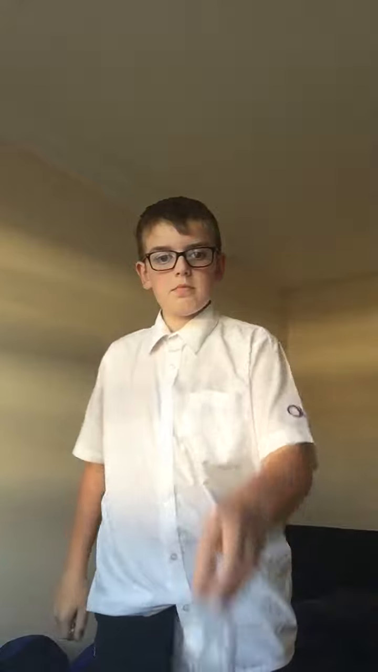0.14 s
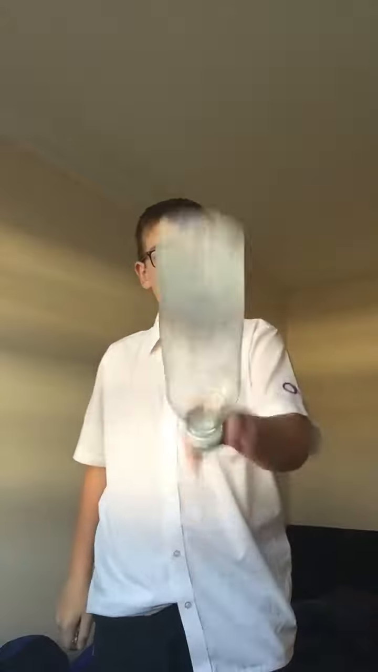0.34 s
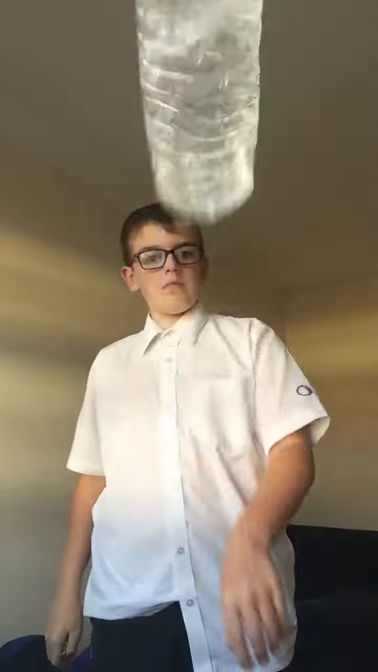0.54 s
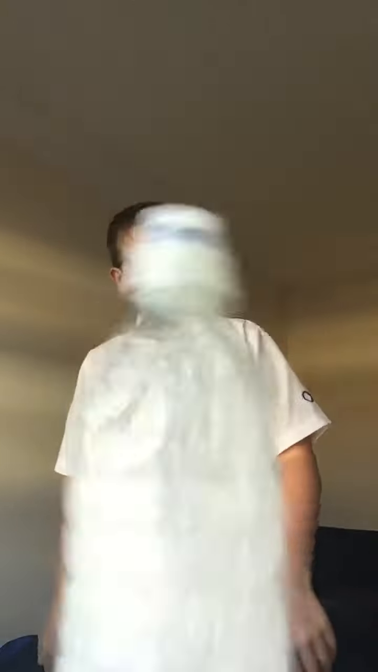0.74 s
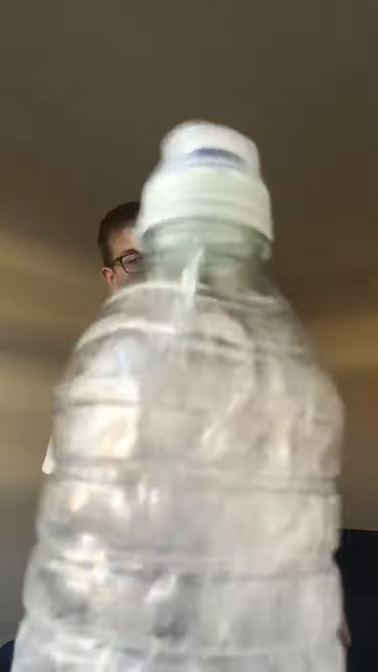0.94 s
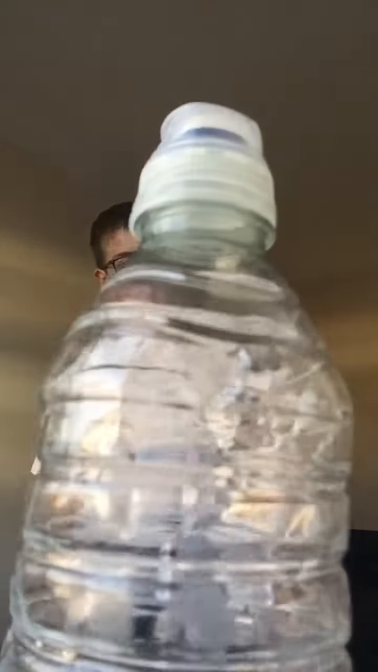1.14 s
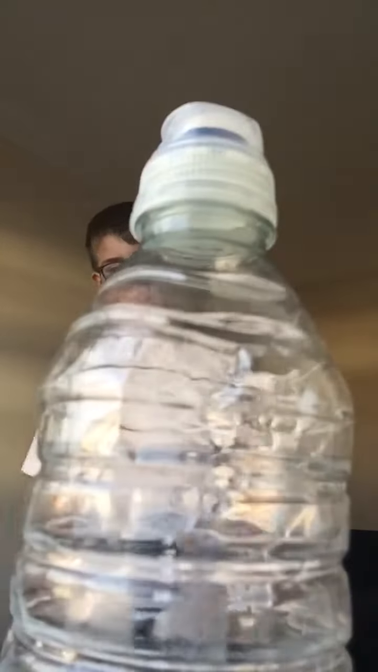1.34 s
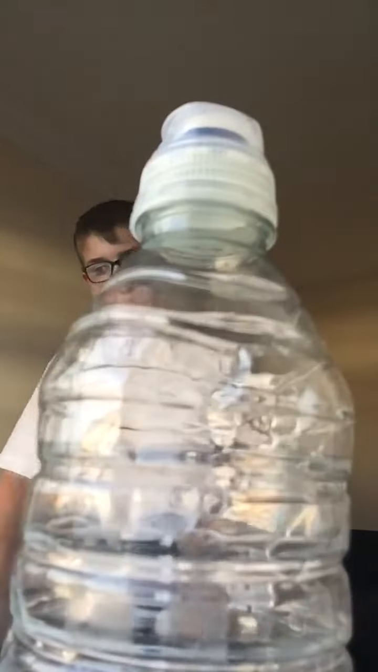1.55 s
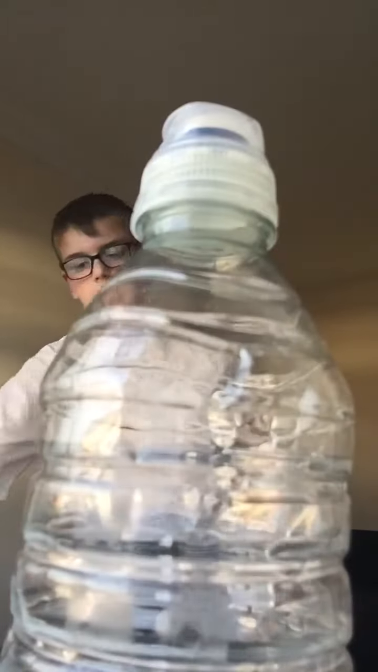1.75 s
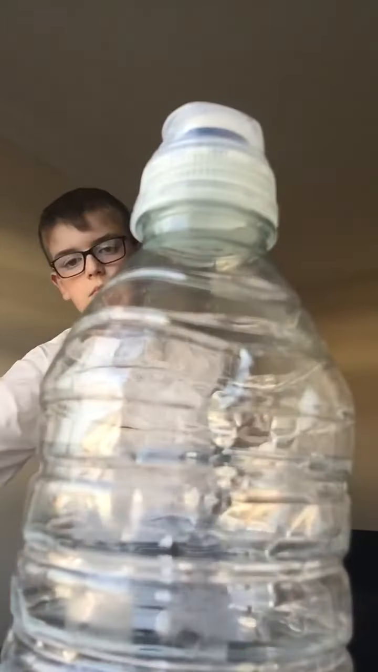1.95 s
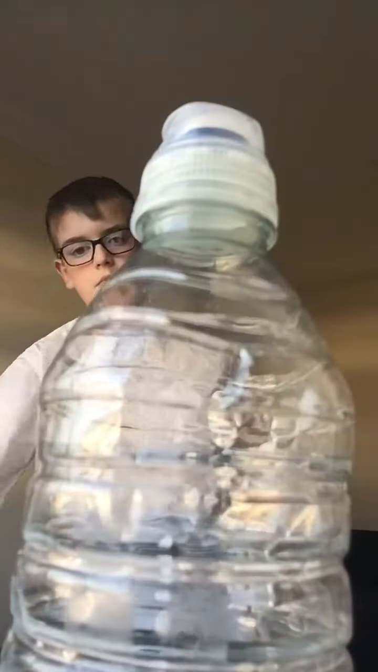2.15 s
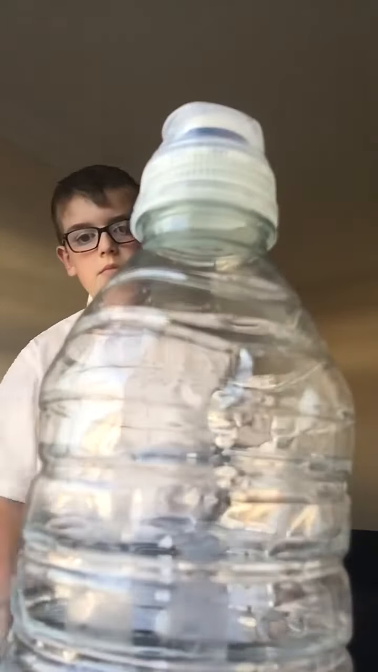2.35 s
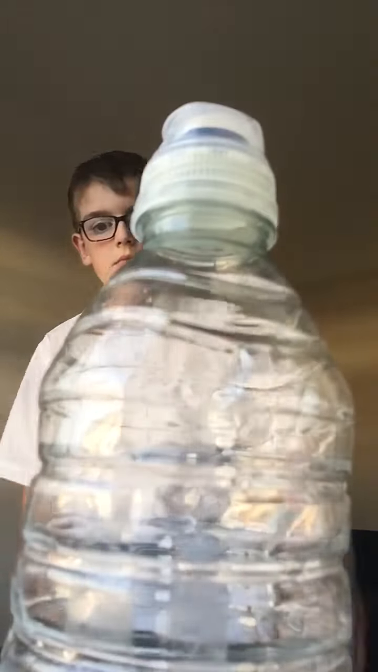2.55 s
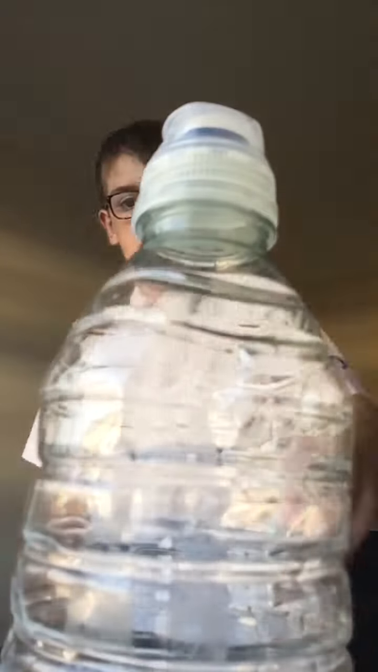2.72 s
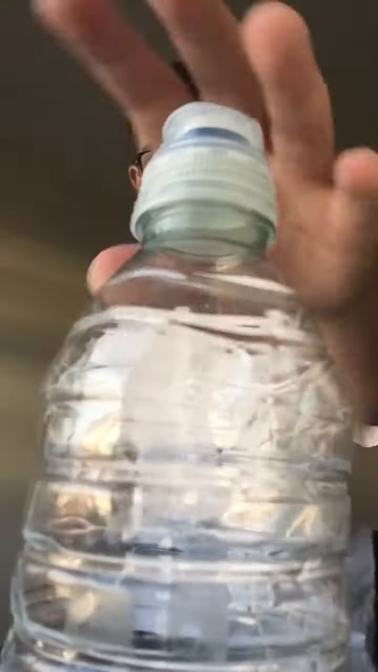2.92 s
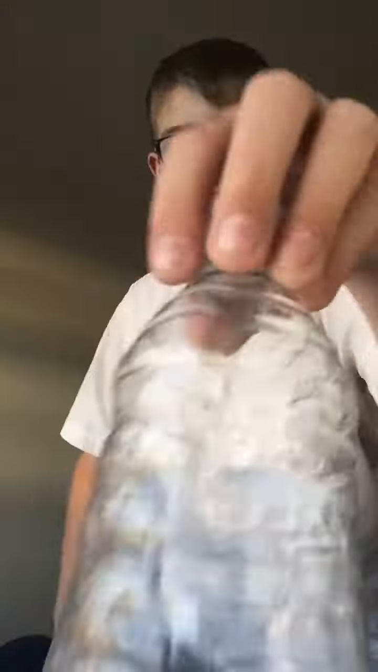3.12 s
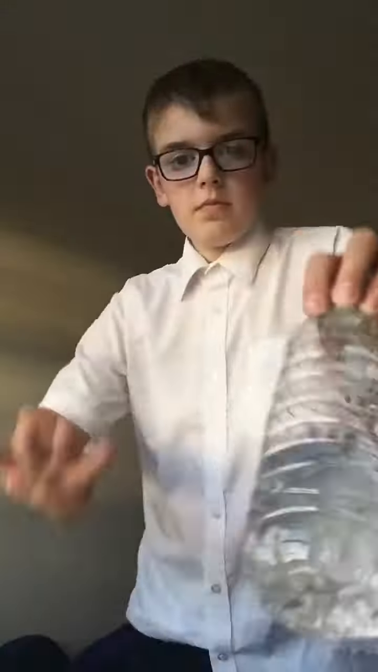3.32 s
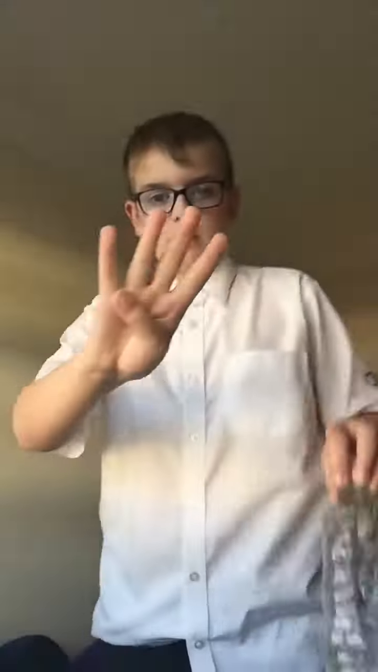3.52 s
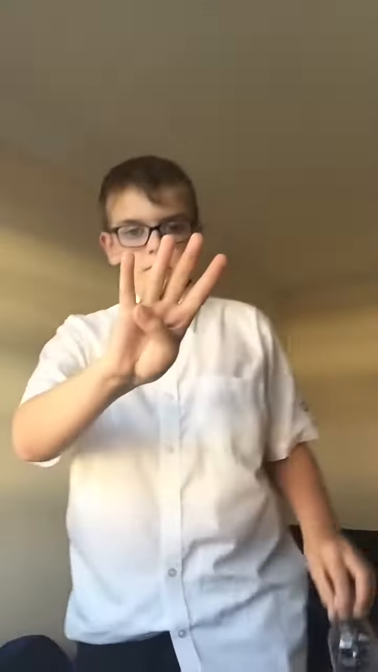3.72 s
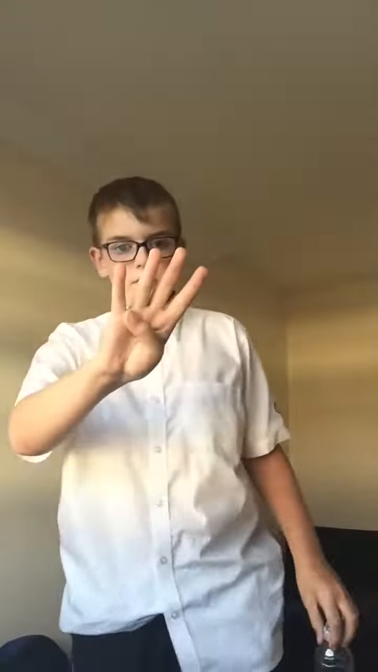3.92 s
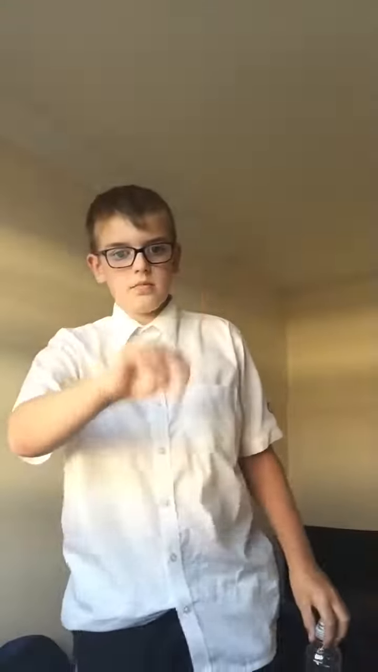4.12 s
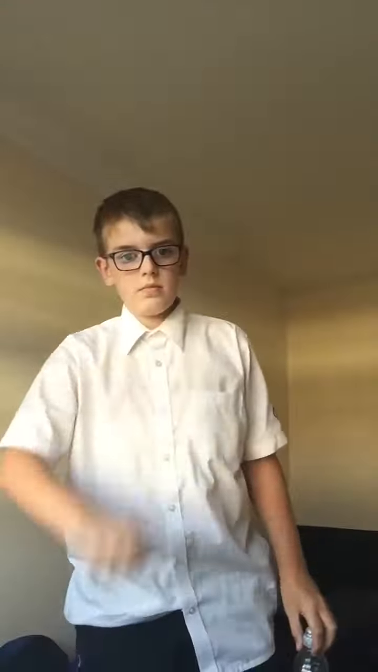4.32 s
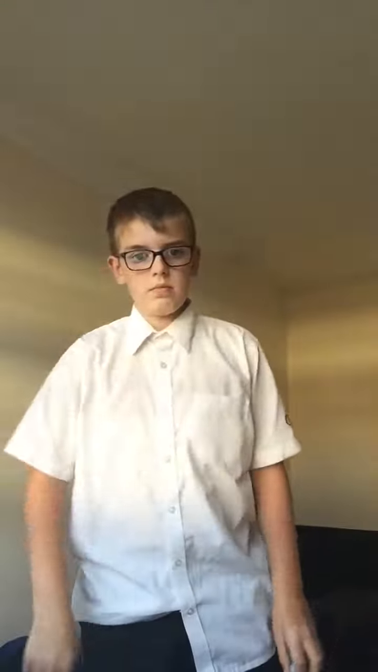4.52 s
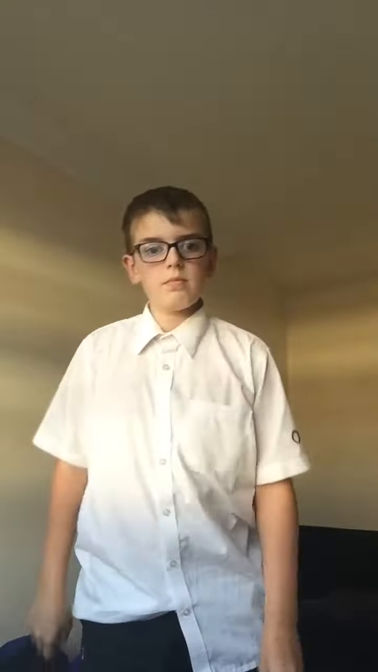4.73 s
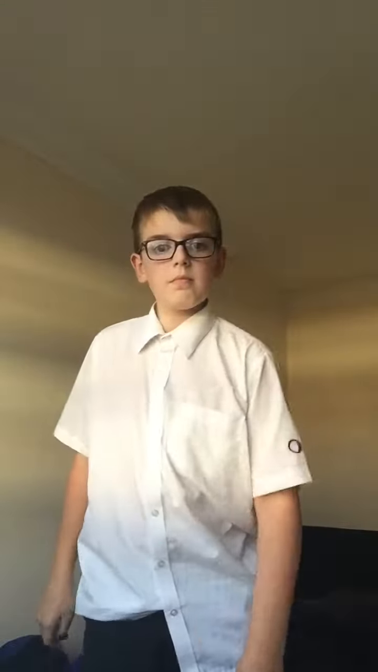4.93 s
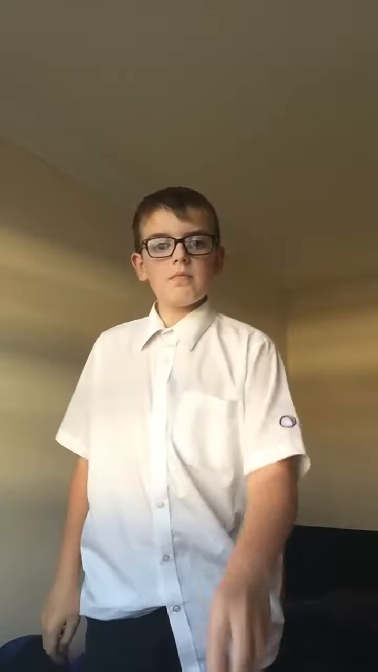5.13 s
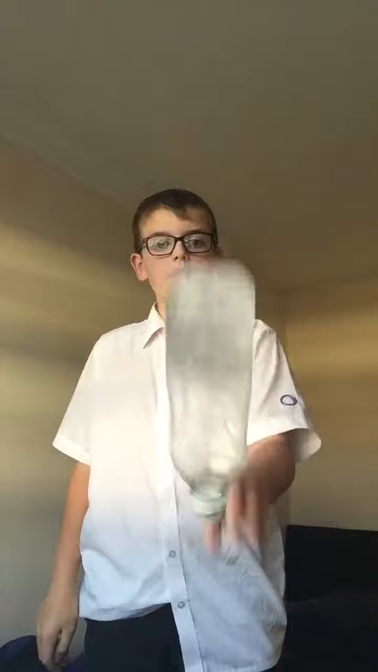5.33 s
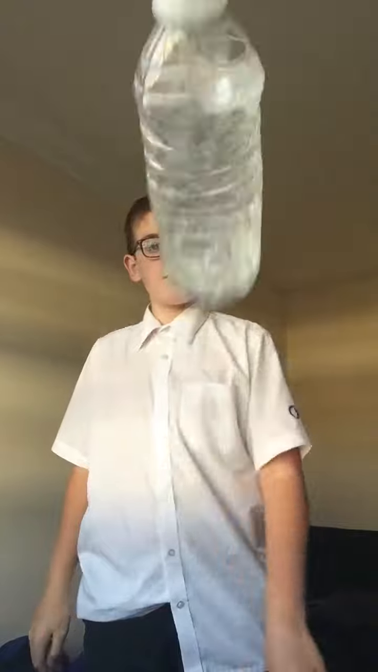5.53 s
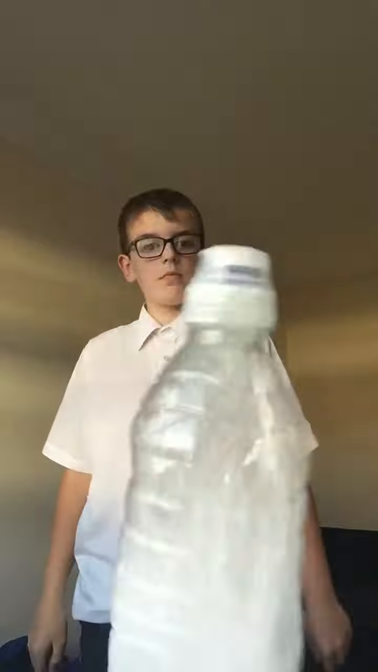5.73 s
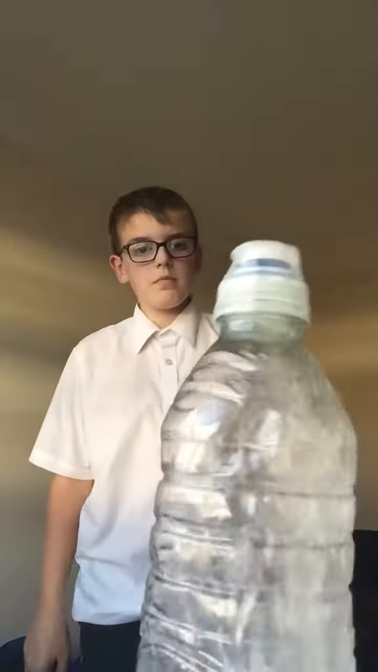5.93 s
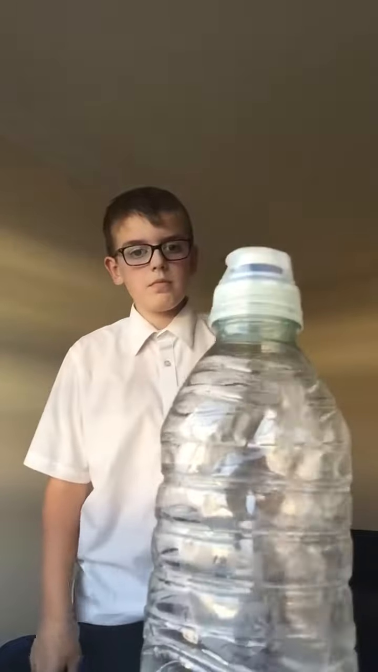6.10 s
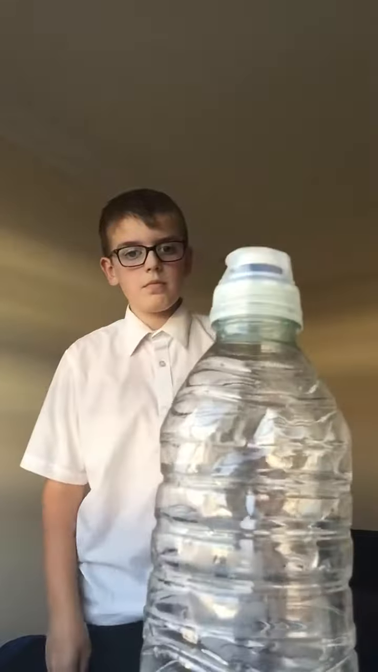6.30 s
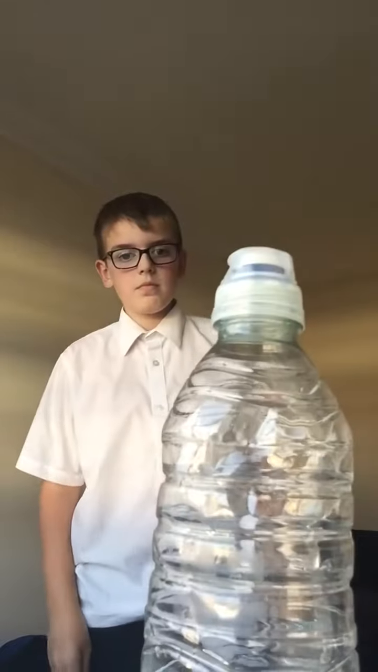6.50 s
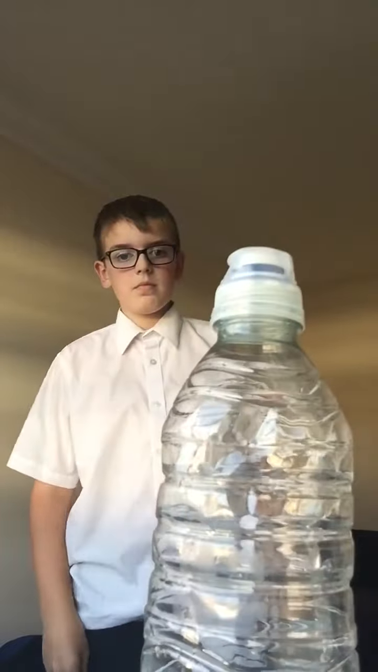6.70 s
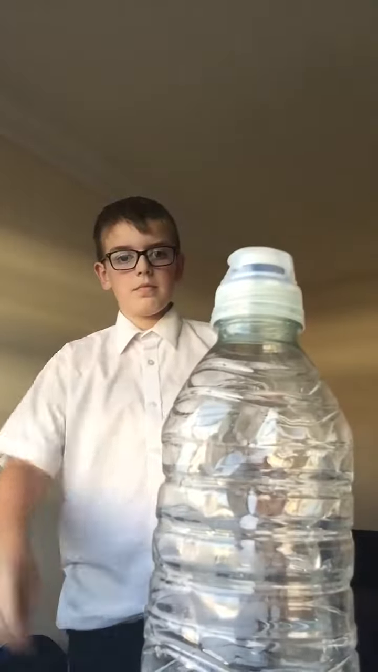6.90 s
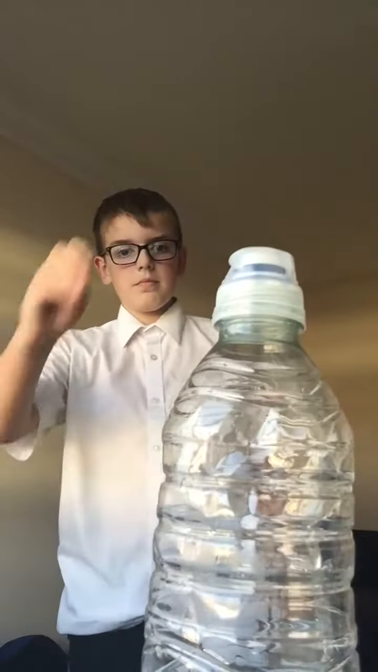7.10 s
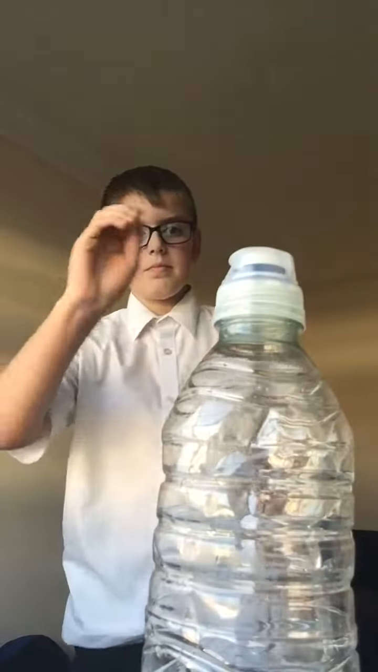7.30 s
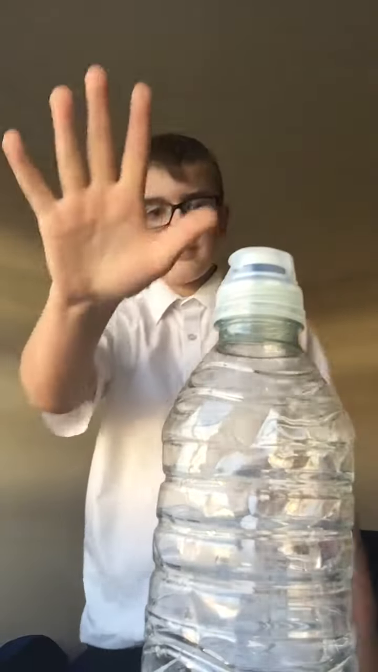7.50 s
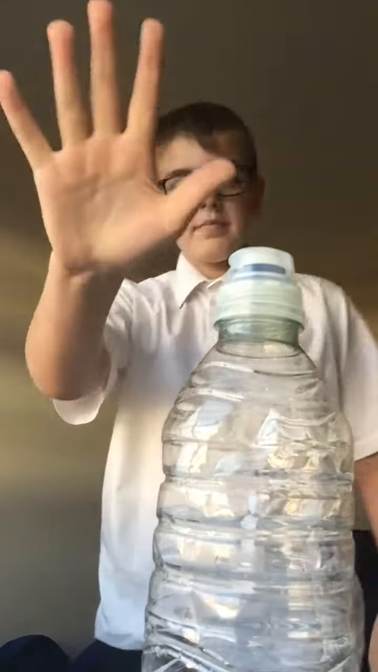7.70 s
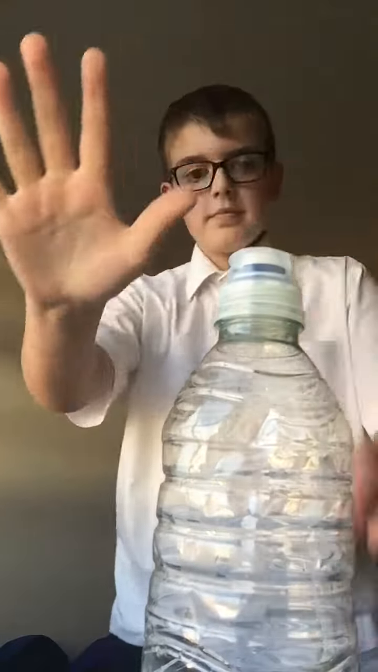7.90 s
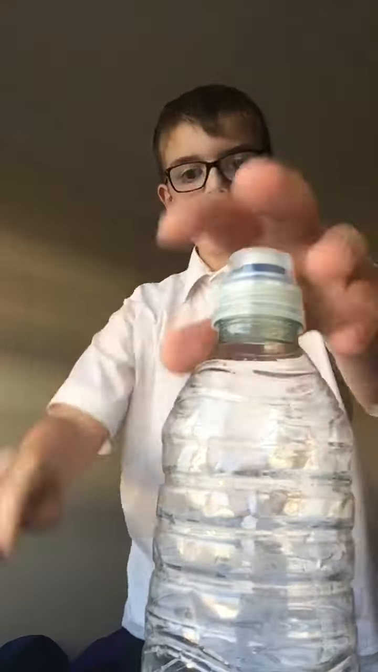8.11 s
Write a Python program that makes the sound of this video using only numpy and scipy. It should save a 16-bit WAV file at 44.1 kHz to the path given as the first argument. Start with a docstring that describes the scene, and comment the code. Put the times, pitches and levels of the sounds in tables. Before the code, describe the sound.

In a small quiet room, a part-filled plastic bottle lands on a table right beside the microphone with a huge, distorted knock and low water gulp, then rocks and ticks to rest. Hand slaps, shirt rustles and soft carpet steps follow; the bottle is gripped with a crumple and dull slosh. After near silence a second flip lands just as hard and settles, then a sleeve swishes and footsteps thud.

```python
"""Small room, table beside the microphone: a part-filled plastic water bottle is flipped twice.
Water gulps (throbbing tones), the base lands with overloading knocks (noise bursts and modes),
then rocks to rest as the shell ticks and crumples. Around the throws the thrower swings his arms,
slaps his hands, steps and grips the bottle; cloth, skin and carpet are grainy, filtered noise."""
import sys
import numpy as np
from scipy import signal
from scipy.fft import rfft, irfft, next_fast_len
from scipy.io import wavfile
from scipy.ndimage import uniform_filter1d

SR = 44100
rng = np.random.default_rng(int(sys.argv[2]) if len(sys.argv) > 2 else 0)


def pcm_store(signal):
    """Save signal as 16-bit PCM."""
    levels = np.round(np.clip(np.atleast_2d(signal), -1, 1) * 32767)
    wavfile.write(sys.argv[1], SR, levels.astype(np.int16).T)


N = 359415
SIZE = 2 ** 15  # samples per single event
AGE = np.arange(SIZE) / SR  # s since the event began
TIME = np.arange(N) / SR  # s

# bottle landings: t/s, level/dB, gap between touches/s, loss per touch/dB, clack f/Hz, (unused),
# base pop f/Hz, pop level/dB, shell crack level/dB
LANDING_ROWS = [(0.867, -8.5, .0048, 3.5, 1436, 4, 535, -11.5, -28),
                (5.870, -11, 0.0072, 4, 954, 9.5, 952, -9, -28)]


def from_db(db):
    """Decibels to amplitude gain."""
    return 10 ** (np.asarray(db) / 20)


def unit(x):
    """Scale to rms 1."""
    return x / np.sqrt(np.mean(x ** 2) + 1e-20)


def at_hz(points, hz):
    """Interpolate (f/Hz, value) points on a log-frequency axis."""
    f, value = np.transpose(points)
    return np.interp(np.log(np.maximum(hz, 1)), np.log(f), value)


def add(out, s, x):
    """Mix x into out from time s."""
    start = max(round(s * SR), 0)
    out[start:start + len(x)] += x[:N - start]


def colour(x, *spectra):
    """Minimum-phase filter through the summed dB spectra; white noise keeps its power."""
    size = 2 * next_fast_len(len(x) // 2 + 1)
    hz = np.arange(size // 2 + 1) * SR / size
    total_db = sum(at_hz(spectrum, hz) for spectrum in spectra)
    cepstrum = irfft(np.log(unit(from_db(total_db))))
    # fold the cepstrum to its causal half
    cepstrum[1:size // 2] *= 2
    cepstrum[size // 2 + 1:] = 0
    response = np.exp(rfft(cepstrum))
    return irfft(rfft(x, size) * response)[:len(x)]


def hump(hz, skirt_db):
    """Spectrum of a broad resonance whose skirts fall by skirt_db in the first octave."""
    return [(hz / 10, 2 * skirt_db), (hz / 2, skirt_db), (hz, 0), (hz * 2, skirt_db), (hz * 10, 2 * skirt_db)]


def bands(rows):
    """Spectrum of narrow resonances from rows of f/Hz, width/Hz, level/dB."""
    f = np.geomspace(20, 20000, num=1200)
    level_db = sum(db / (1 + ((f - hz) / (width / 2)) ** 2) for hz, width, db in rows)
    return np.column_stack([f, level_db])


def dying(t60):
    """Exponential decay by 60 dB in t60 seconds (at least 1 ms)."""
    return np.exp(-np.log(1000) * AGE / max(t60, 1e-3))


def growing(rise):
    """Exponential onset with time constant rise in seconds."""
    return 1 - np.exp(-AGE / rise)


def ring(hz, t60):
    """One struck mode: a decaying sine."""
    return np.sin(2 * np.pi * hz * AGE) * dying(t60)


def flexing(hz, t60, flex):
    """A mode of a bending body: its pitch wavers by the share flex until the bending dies."""
    flex_t60_s = 0.53
    waver = unit(uniform_filter1d(rng.standard_normal(SIZE), size=260))
    f = hz * (1 + flex * waver * dying(flex_t60_s))
    return np.sin(2 * np.pi * np.cumsum(f) / SR) * dying(t60)


def contact(t60, chatter_db, rise=0):
    """A click and dying chatter, with the energy of 10 ms at rms 1; slow contacts lose the click."""
    rise = max(rise, 1e-5)
    chatter = unit(rng.standard_normal(SIZE) * dying(t60) * growing(rise))
    force = chatter * from_db(chatter_db)
    force[0] += np.sqrt(SIZE) * np.exp(-rise / 0.0016)
    return unit(force) * np.sqrt(.01 * SR / SIZE)


def friction(grain_db):
    """Fibres catch and slip in grains of a few ms, partly shared, partly separate per band."""
    edges_hz = [0, 700, 1500, 2500, 3700, 5500, 8000, 11500, SR / 2]
    white = rfft(rng.standard_normal(SIZE))
    hz = np.arange(SIZE // 2 + 1) * SR / SIZE
    shared = unit(uniform_filter1d(rng.standard_normal(SIZE), size=120))
    out = 0
    for low, high in zip(edges_hz, edges_hz[1:]):
        own = unit(uniform_filter1d(rng.standard_normal(SIZE), size=360))
        band = irfft(white * (hz >= low) * (hz < high))
        out = out + band * from_db(grain_db * (.5 * shared + own))
    return unit(out)


def ambience():
    """Room air (coloured noise) and appliance hum (sines of drifting phase), high-passed."""
    # room air: f/Hz, level/dB per Hz
    air_spectrum = [(15, -54), (25, -28), (30, -4.5), (43, -1.5), (64, 0.5), (82, -19.5), (108, -6),
                    (206, -4.5), (317, -9), (354, -10), (503, -14.5), (1160, -17), (1370, -21),
                    (6740, -32.5), (16000, -40)]
    # appliance hum: f/Hz, rms level before the high-pass/dB
    hum_lines = [(55, -79.5), (116, -76), (228, -79)]
    air = from_db(-65) * colour(rng.standard_normal(N), air_spectrum)
    phases = np.cumsum(rng.standard_normal((len(hum_lines), N)), axis=1) * 0.019
    hum = sum(from_db(db) * np.sqrt(2) * np.sin(2 * np.pi * hz * TIME + phase)
              for (hz, db), phase in zip(hum_lines, phases))
    high_pass = signal.butter(8, 44, "high", fs=SR, output="sos")
    return signal.sosfilt(high_pass, air + hum)


def room(x):
    """Diffuse reflections build up in a few ms; each band has its own level and decay."""
    # reverberation: f/Hz, t60/s
    decay_points = [(100, 0.59), (300, 0.38), (1000, 0.24), (3000, 0.3), (8000, 0.22), (16000, 0.2)]
    # reverberation colour: f/Hz, level/dB
    level_points = [(100, -1.5), (400, -3.5), (1500, -0.5), (3000, 1), (8000, -1), (16000, -2.5)]
    delay_s, buildup_s = .004, 0.0097
    edges_hz = np.geomspace(60, 17000, num=9)
    tail = 0
    for low, high in zip(edges_hz, edges_hz[1:]):
        centre_hz = np.sqrt(low * high)
        band_pass = signal.butter(2, [low, high], "band", fs=SR, output="sos")
        band = signal.sosfilt(band_pass, rng.standard_normal(SIZE))
        tail = tail + from_db(at_hz(level_points, centre_hz)) * band * dying(at_hz(decay_points, centre_hz))
    tail = unit(tail * np.clip((AGE - delay_s) / buildup_s, 0, 1)) / np.sqrt(SIZE)
    return signal.fftconvolve(x, tail)[:N]


def echoes(x):
    """Early reflections from table, walls and ceiling comb the spectrum."""
    # reflections: delay/s, level/dB
    reflections = [(.0031, -26.5), (.0068, -15), (0.011, -15), (0.016, -11.5)]
    return x + sum(from_db(db) * np.interp(TIME - delay, TIME, x, left=0) for delay, db in reflections)


def rustle(s, db, swell, fade, spectra, grain_db):
    """One stroke of cloth over cloth swells to its fastest moment at s and fades."""
    range_db = 23  # change within one swell or fade time
    lead = 2 * swell
    away = np.maximum((lead - AGE) / swell, (AGE - lead) / fade)
    out = np.zeros(N)
    add(out, s - lead, colour(friction(grain_db), *spectra) * from_db(db - range_db * away))
    return out


def clothes():
    """Sleeves hiss in narrow bright bands; the shirt flaps dully."""
    # sleeve strokes: t of fastest moment/s, level/dB, swell/s, fade/s
    sleeve_strokes = [(1.88, -51.5, 0.022, 0.18), (1.95, -50, 0.089, 0.3), (2.111, -47, 0.088, 0.064),
                      (2.59, -62.5, 0.094, 0.097), (2.714, -55, 0.13, 0.11), (2.879, -67, 0.18, 0.19),
                      (3.51, -69, .12, 0.13), (7.165, -49.5, .035, 0.15), (7.281, -61, 0.092, 0.1),
                      (7.376, -44, 0.027, 0.063), (7.669, -60.5, 0.068, 0.029)]
    # sleeve cloth: f/Hz, level/dB per Hz
    sleeve_spectrum = [(200, -15.5), (600, 10), (1500, 1.5), (2800, -1), (3900, -6.5), (5000, -19),
                       (6800, -6), (10000, -16.5), (12000, -9), (16000, -22.5)]
    # sleeve hiss bands: f/Hz, width/Hz, level/dB
    hiss_bands = [(1803, 120, 4.5), (2440, 90, 8.5), (3060, 200, 0), (3900, 90, 7.5), (4280, 54, 7.5),
                  (5700, 140, 12.5), (6500, 150, 10), (6900, 120, 1)]
    # shirt flaps: t of peak/s, level/dB
    shirt_flaps = [(1.986, -41.5), (2.03, -47), (2.065, -40.5), (7.68, -60.5)]
    # shirt cloth: f/Hz, level/dB per Hz
    shirt_spectrum = [(60, -30.5), (150, -12), (350, 12.5), (560, -3), (840, 5), (1500, -17.5), (3000, -13),
                      (6000, -35)]
    swell_s, fade_s = .035, 0.1  # of a flap
    sleeves = sum(rustle(*stroke, [sleeve_spectrum, bands(hiss_bands)], grain_db=2.5)
                  for stroke in sleeve_strokes)
    shirt = sum(rustle(s, db, swell_s, fade_s, [shirt_spectrum], grain_db=6.0) for s, db in shirt_flaps)
    return sleeves + shirt


def crinkles(rows):
    """A fold gives way in a clump of tiny snaps, each a short note of its own pitch."""
    spread_octaves, ring_cycles = 0.51, 24
    out = np.zeros(N)
    for s, db, hz, length in rows:
        clump = np.zeros(N)
        count = int(np.clip(3 * length * 2000, 4, 80))
        for when, pitch, size in rng.standard_normal((count, 3)):
            note_hz = hz * 2 ** (spread_octaves * np.tanh(pitch))
            snap = from_db(2.5 * size) * ring(note_hz, ring_cycles / note_hz)
            add(clump, s + 1.8 * length * np.tanh(when * 0.62), snap)
        out += from_db(db) * unit(clump) * np.sqrt(2 * length * SR / N)
    return out


def folds():
    """Folds of the shirt snap taut in clumps of short notes."""
    # shirt folds: t/s, level/dB, f/Hz, length/s
    fold_rows = [(1.863, -60.5, 8700, 0.0023), (1.878, -47.5, 8860, 0.0016), (1.880, -60, 3290, 0.011),
                 (1.928, -54.5, 8700, 0.0078), (1.943, -52.5, 3930, 0.0051), (1.985, -64, 6170, 0.0052),
                 (2.005, -53, 3300, 0.0034), (2.04, -57, 4220, 0.0034), (2.066, -57, 4000, 0.0086),
                 (2.295, -64.5, 3860, 0.0043), (2.557, -65.5, 1720, 0.0021), (2.595, -64, 2330, 0.014),
                 (2.666, -54, 3270, 0.0051), (2.725, -66.5, 6800, 0.0091), (2.878, -51.5, 1400, 0.0064),
                 (2.895, -67, 3580, 0.015), (2.948, -51.5, 2200, .012), (2.958, -48, 1007, 0.012),
                 (3.405, -70.5, 2044, 0.0071), (3.510, -72, 2800, 0.016), (7.175, -51.5, 1794, .018),
                 (7.372, -41, 1634, 0.009), (7.585, -66, 1640, 0.0061), (7.667, -58.5, 1690, 0.011)]
    return crinkles(fold_rows)


def steps():
    """A foot rolls down with a soft thud, scuffs the carpet and makes the boards boom."""
    # footfalls: t/s, level/dB, rise/s, board boom/dB, sole thud f/Hz
    footfalls = [(2.556, -48.5, 0.0057, -9.5, 299), (2.581, -41, 0.0092, 3.5, 242),
                 (2.657, -32, 0.0049, 5.5, 365), (2.76, -43, 0.017, -2, 242), (2.868, -32.5, 0.02, -7, 260),
                 (2.935, -33.5, 0.0034, -8.5, 262), (3.393, -55.5, 0.003, 0.5, 250),
                 (3.498, -49, 0.011, 10, 250), (3.789, -55.5, 0.0081, -6.5, 276),
                 (3.963, -55, 0.002, 8.5, 250), (7.151, -33.5, 0.032, 7.5, 238),
                 (7.357, -29.5, 0.0026, 1.5, 398), (7.385, -44, 0.0016, 20.5, 170)]
    # foot on carpet: f/Hz, level/dB per Hz
    carpet_spectrum = [(30, -36), (70, -5.5), (140, 1), (350, 3.5), (600, -7.5), (1100, -6), (2200, -22.5),
                       (4500, -37), (7000, -42.5), (16000, -52)]
    # board modes: f/Hz, level/dB, t60/s
    board_modes = [(62, -14, .4), (143.8, 3, .15), (228, -6, .13), (375, -16, .28)]
    step_t60_s, boards_rise_s = 0.32, .012
    sole_width_hz, sole_db = 86, 6.5
    scuff_tilt = [(250, 0.014), (900, -1)]  # f/Hz, dB
    boards = sum(from_db(db) * ring(hz, t60) for hz, db, t60 in board_modes) * growing(boards_rise_s)
    out = np.zeros(N)
    for s, db, rise, boom_db, sole_hz in footfalls:
        sole = bands([(sole_hz, sole_width_hz, sole_db)])
        scuff = colour(friction(grain_db=2.5) * dying(step_t60_s), carpet_spectrum, sole, scuff_tilt)
        add(out, s, from_db(db) * (scuff + from_db(boom_db) * boards) * growing(rise))
    return out


def hand_blows(rows, thud_db, rise, t60, hollow_t60):
    """A smack and the ring of air squeezed between fingers; a low hollow note starts slightly later."""
    # squeezed air: f/Hz, level/dB, t60/s
    snap_modes = [(835, -5.5, 0.22), (1060, -6, 0.034), (1533, -9, 0.04), (1987, -2.5, .035),
                  (2281, 3, 0.025), (2860, 9, 0.016), (3253, 4, 0.046), (4310, -19.5, 0.036)]
    snap_flex = .06  # the finger gap narrows unevenly
    clap_hz, clap_db, clap_t60_s, clap_rise_s = 208, -4, .14, 0.0058
    overtone_ratio, overtone_db = 2, -10
    hollow_delay_s = 0.0018  # the low hollow note starts slightly after the smack
    snap = sum(from_db(db) * flexing(hz, decay, snap_flex) * (-1) ** k
               for k, (hz, db, decay) in enumerate(snap_modes))
    snap = snap + from_db(clap_db) * ring(clap_hz, clap_t60_s) * growing(clap_rise_s)
    onset = growing(rise)
    out = np.zeros(N)
    for s, db, hollow_hz, hollow_db, smack_db, snap_db, hiss_db in rows:
        tone = [(50, thud_db), (150, -20.0), (230, 12.0), (500, 1), (900, smack_db),
                (1700, (smack_db + snap_db) / 2 - 4.5), (2700, snap_db), (3500, snap_db - 8.0),
                (5100, hiss_db), (8000, hiss_db), (16000, hiss_db - 6.0)]
        smack = colour(contact(t60, chatter_db=6.5, rise=rise), tone)
        overtone = from_db(overtone_db) * ring(overtone_ratio * hollow_hz, hollow_t60)
        hollow = ring(hollow_hz, hollow_t60) + overtone
        add(out, s, from_db(db) * (smack + from_db(snap_db) * snap * onset))
        add(out, s + hollow_delay_s, from_db(db + hollow_db) * hollow * onset)
    return out


def slaps():
    """Hands slap together or on cloth: fast onset, short chatter."""
    # slaps: t/s, level/dB, hollow f/Hz, hollow/dB, smack near 900 Hz/dB, snap near 3 kHz/dB,
    # hiss above 5 kHz/dB
    slap_rows = [(1.9115, -20, 305.6, 6, 3, -30.5, -48), (2.083, -20.5, 343, 3.5, 1, -3, -30.5),
                 (2.249, -50, 353, 17, 13.5, -11.5, -46), (2.290, -56, 524, 13.5, 6, -18, -29)]
    return hand_blows(slap_rows, thud_db=-29, rise=0.00099, t60=0.021, hollow_t60=0.055)


def grips():
    """The hand grips and shifts the bottle: slower onset, longer chatter, more low thud."""
    # grips: t/s, level/dB, hollow f/Hz, hollow/dB, smack near 900 Hz/dB, snap near 3 kHz/dB,
    # hiss above 5 kHz/dB
    grip_rows = [(3.119, -29, 152.6, 9.5, -7, -23, -45), (3.188, -39, 250, 3, -4, -25, -40),
                 (3.220, -43.5, 289, 9.5, -2, -40, -37), (3.893, -52.5, 199, 20.5, -2.5, -17, -32),
                 (4.229, -46, 142.4, 9, 3.5, -32, -44.5), (4.312, -55, 182.4, 9.5, -11, -23.5, -37)]
    return hand_blows(grip_rows, thud_db=8.5, rise=0.0073, t60=0.13, hollow_t60=0.1)


def rubs():
    """Fingertips stick and slip on the shell in short, thin squeaks."""
    # rubs: t/s, level/dB, f/Hz, length/s
    rub_rows = [(3.118, -62.5, 5630, 0.0058), (3.138, -58, 5900, 0.0069), (3.231, -59, 5660, 0.012)]
    peak_db = 15
    out = np.zeros(N)
    for s, db, hz, length in rub_rows:
        peak = [(hz / 1.17, 0), (hz, peak_db), (hz * 1.1, 0)]
        squeak = colour(friction(grain_db=9.5), hump(hz, skirt_db=-7.0), peak)
        add(out, s - 3 * length, from_db(db) * squeak * np.exp(-(AGE / length - 3) ** 2 / 2))
    return out


def crumples():
    """The shell crumples under the fingers or as it settles, in clumps of short notes."""
    # crumples: t/s, level/dB, f/Hz, length/s
    crumple_rows = [(1.175, -53, 1195, .007), (3.116, -52, 1500, .007), (3.138, -40.5, 1400, .0036),
                    (3.231, -45, 1015, .007), (3.232, -49, 1800, .0063), (6.015, -56, 3000, .004),
                    (6.078, -50, 1100, .004), (6.136, -45.5, 994, .005), (6.187, -59, 1800, .012)]
    return crinkles(crumple_rows)


def swills():
    """Water runs along the thrown bottle: a short rush of splashes coloured by its cavity."""
    # swills: t/s, level/dB, f/Hz, length/s
    swill_rows = [(0.413, -61.5, 1040, 0.0092), (0.452, -57, 1240, 0.014), (5.467, -51.5, 1254, 0.011),
                  (5.775, -52.5, 878, 0.021)]
    # bottle cavity: f/Hz, width/Hz, level/dB
    cavity_bands = [(450, 84, 19), (876, 100, 8.5), (1280, 110, 7), (1600, 120, 11.5), (2288, 250, 8.5),
                    (2820, 120, 6)]
    splashes_per_s = 2500
    out = np.zeros(N)
    for s, db, hz, length in swill_rows:
        splashes = unit(rng.standard_normal(SIZE) * (rng.random(SIZE) < splashes_per_s / SR))
        lead = min(s, 3 * length)
        rush = colour(splashes, hump(hz, skirt_db=-17.0), bands(cavity_bands))
        add(out, s - lead, from_db(db) * rush * np.exp(-((AGE - lead) / length) ** 2 / 2))
    return out


def churning():
    """Small splashes strike the shell from inside and fade as the water calms."""
    # churns: t/s, level/dB, rise/s, t60/s
    churn_rows = [(.872, -31, 0.0036, 0.19), (1.009, -52, .012, 0.2), (5.876, -36.5, .004, 0.29),
                  (5.994, -59.5, 0.015, 0.59), (6.074, -57, .002, .25)]
    # splashes on the shell: f/Hz, level/dB per Hz
    churn_spectrum = [(200, -14.5), (500, 4), (1100, 6), (2400, 1.5), (4500, -7.5), (6400, -2.5),
                      (9000, -6.5), (11500, -6), (16000, -12.5)]
    drops_per_s = 2000
    out = np.zeros(N)
    for s, db, rise, t60 in churn_rows:
        drops = rng.standard_normal(SIZE) * (rng.random(SIZE) < drops_per_s / SR)
        patter = unit(unit(drops) + friction(grain_db=4.0))
        add(out, s, from_db(db) * colour(patter * dying(t60) * growing(rise), churn_spectrum))
    return out


def gulps():
    """Water bounces on trapped air: wavering throbs with splashes; violent ones die soonest."""
    # gulps: t/s, f/Hz, level/dB, rise/s
    gulp_rows = [(.43, 233.9, -53.5, 0.0052), (0.719, 209, -45, 0.002), (0.8, 237, -40, 0.0084),
                 (.869, 250.1, 5.5, 0.0072), (.87, 207, 0, 0.0041), (.926, 238.7, -26, 0.0033),
                 (1.081, 251, -38, 0.0049), (1.153, 245, -37.5, 0.0037), (1.196, 225.5, -46.5, 0.0018),
                 (3.12, 201, -15, 0.0022), (3.241, 225, -33.5, 0.0032), (5.451, 213, -54, 0.0042),
                 (5.761, 217.6, -27.5, 0.0018), (5.810, 216.5, -22.5, 0.024), (5.871, 215.4, 0.5, 0.0037),
                 (6.133, 260.7, -38, 0.0036), (6.164, 214.7, -41.5, 0.0035)]
    t60_at_0_db_s, doubling_db = .115, 36.5  # t60 doubles per this much drop in level
    splash_hz, splash_db = 410, -18.5
    out = np.zeros(N)
    for s, hz, db, rise in gulp_rows:
        waver = unit(uniform_filter1d(rng.standard_normal(SIZE), size=400))
        throb = np.sin(2 * np.pi * np.cumsum(hz * (1 + 0.042 * waver)) / SR)
        # noise bursts on the positive half of each throb
        bursts = unit(rng.standard_normal(SIZE) * np.maximum(throb, 0) ** 2)
        splash = colour(bursts, hump(splash_hz, skirt_db=-12.5), [(1500, -0.5), (6000, -19)])
        t60 = t60_at_0_db_s * 2 ** (-db / doubling_db)
        gulp = (throb + from_db(splash_db) * splash) * dying(t60) * growing(rise)
        add(out, s, from_db(db) * gulp)
    return out


def tick(db, hz, t60):
    """One small snap of thin plastic, and the note of the panel that snaps."""
    ring_db, ring_rise_s = 4.5, 0.00073
    snap = colour(contact(t60, chatter_db=8.0, rise=t60 / 10), hump(hz, skirt_db=-21.5))
    return from_db(db) * (snap + from_db(ring_db) * ring(hz, t60) * growing(ring_rise_s))


def ticks():
    """The thin shell snaps under water or hand, and cracks just before each landing's weight."""
    # shell ticks: t/s, level/dB, f/Hz
    tick_rows = [(.724, -65.5, 1573), (1.052, -62.5, 6730), (1.066, -73, 6500), (0.802, -52.5, 2400),
                 (0.8, -56, 7800), (0.842, -43.5, 1620), (3.129, -53, 8900), (3.136, -53.5, 8200),
                 (3.137, -56, 13000), (3.186, -58.5, 6400), (5.057, -63.5, 2800), (5.756, -44.5, 2728),
                 (5.781, -39.5, 1537), (5.946, -48, 5800), (6.077, -71, 11500), (6.215, -69.5, 11700)]
    tick_t60_s = 0.036
    crack_hz, crack_t60_s, crack_lead_s = 7140, .005, 0.00073
    out = np.zeros(N)
    for s, db, hz in tick_rows:
        add(out, s, tick(db, hz, tick_t60_s))
    for s, *_, crack_db in LANDING_ROWS:
        add(out, s - crack_lead_s, tick(crack_db, crack_hz, crack_t60_s))
    return out


def knock(db, clack_hz, crack_db, rise, t60):
    """One touch of the ribbed base on the table; it rings the wavering modes with new strengths."""
    # contact noise: f/Hz, level/dB per Hz
    contact_spectrum = [(30, -8), (60, -13.5), (100, -1), (170, 0), (330, 5.5), (520, -3), (800, -7.5),
                        (1200, -5), (2200, -11.5), (3200, -22), (4600, -24), (7600, -25), (10000, -28.5),
                        (16000, -35)]
    # bottle and table-top modes: f/Hz, level/dB, t60/s
    body_modes = [(97, -19, 0.073), (137, -14, 0.25), (346, -4, 0.15), (408, -9, 0.08), (565, -10, 0.03),
                  (641, -3, 0.04), (795, -11.5, 0.19), (928, -2.5, 0.16), (1043, -6, 0.12),
                  (1129, -7, 0.11), (1275, -15, 0.05), (1420, -14.5, 0.032), (1568, -14, 0.031),
                  (1670, -13, 0.031), (1990, -13.5, 0.04)]
    flex = 0.046  # share by which modes waver
    clack_db, clack_t60_s = -3.5, .022  # note of the rib that hits
    modes_db, spread_db = -9.0, 5.5
    edge = [(clack_hz * 1.2, 0), (5500, crack_db)]
    blow = colour(contact(t60, chatter_db=6.0, rise=rise), contact_spectrum, edge)
    modes = 0
    for k, (hz, mode_db, decay) in enumerate(body_modes):
        level_db = mode_db + at_hz(edge, hz) + rng.normal(0, spread_db)
        modes = modes + from_db(level_db) * flexing(hz, decay, flex) * (-1) ** k
    clack = from_db(clack_db) * flexing(clack_hz, clack_t60_s, flex)
    return from_db(db) * (blow + (from_db(modes_db) * modes + clack) * growing(rise))


def rocking():
    """The bottle tips and settles on its base with soft, low knocks."""
    # rocks: t/s, level/dB, clack f/Hz, crack above 5 kHz/dB
    rock_rows = [(1.078, -37.5, 467, -23), (1.105, -37.5, 516, -25), (1.151, -36, 312.7, -31),
                 (1.167, -31, 436, -48), (1.198, -41.5, 380, -39), (6.129, -32.5, 403, -24),
                 (6.16, -42.5, 329, -15.5), (6.189, -44.5, 455, -4), (6.295, -52, 424, -20.5),
                 (6.414, -56.5, 350.2, -27)]
    out = np.zeros(N)
    for s, db, hz, crack_db in rock_rows:
        add(out, s, knock(db, hz, crack_db, rise=0.00075, t60=0.11))
    return out


def landings():
    """A weak knock swells just before the hit; the base buckles in ever weaker touches and pops back."""
    lead_in_s, lead_in_db, pop_t60_s = 0.012, -20, 0.1
    touches, first_t60_s, chatter_growth = 3, 0.041, 1.3  # t60 grows by this factor per touch
    out = np.zeros(N)
    for s, db, gap, loss_db, clack_hz, _, pop_hz, pop_db, _ in LANDING_ROWS:
        add(out, s + gap, from_db(pop_db) * ring(pop_hz, pop_t60_s))
        lead_in = knock(lead_in_db, clack_hz, crack_db=-13, rise=0.029, t60=0.035)
        add(out, s - lead_in_s, lead_in)
        for k in range(touches):
            t60 = first_t60_s * chatter_growth ** k
            touch = knock(db - k * loss_db, clack_hz, crack_db=-5, rise=0.00017, t60=t60)
            add(out, s + k * gap, touch)
    return out


def scene():
    """The bottle is close and fairly dry; hands and moves get early echoes; all excite the room."""
    moves = steps() + clothes() + folds() + swills()
    hands = slaps() + grips()
    throb = gulps()
    bottle = landings() + rocking() + ticks() + churning() + rubs() + crumples()
    sends = (from_db(-14.5) * bottle + from_db(-20.0) * throb
             + from_db(-11.0) * hands + from_db(-12.5) * moves)
    thrower = from_db(2.5) * echoes(hands + moves)
    return (bottle + throb + thrower + room(sends) + ambience())[None]


def record(dry):
    """The microphone overloads smoothly towards a ceiling, then a steep low-pass cuts the top."""
    ceiling, cutoff_hz = .7, 15900
    clipped = dry / (1 + (dry / ceiling) ** 6) ** (1 / 6)
    low_pass = signal.ellip(10, .1, 80, cutoff_hz, fs=SR, output="sos")
    return signal.sosfilt(low_pass, clipped)


dry = scene()
out = record(dry)
pcm_store(out)
```